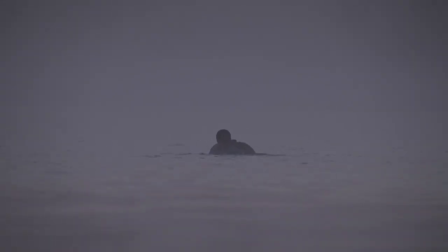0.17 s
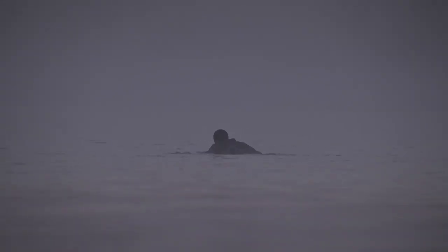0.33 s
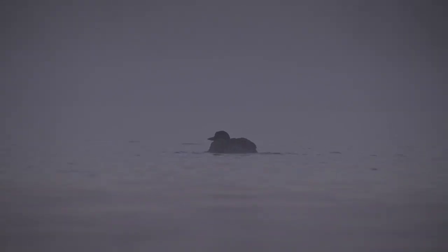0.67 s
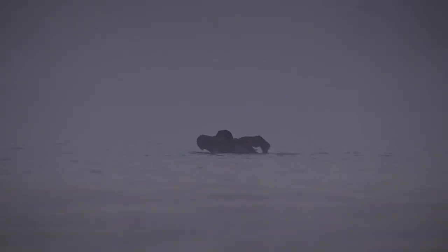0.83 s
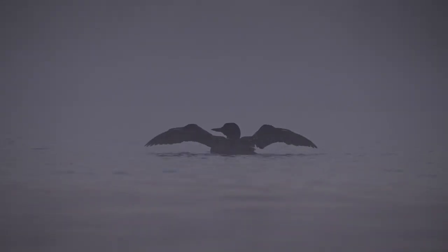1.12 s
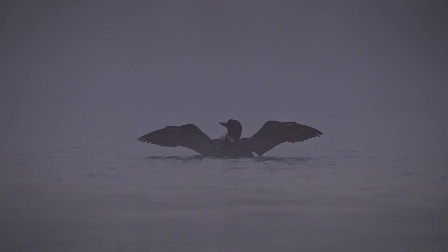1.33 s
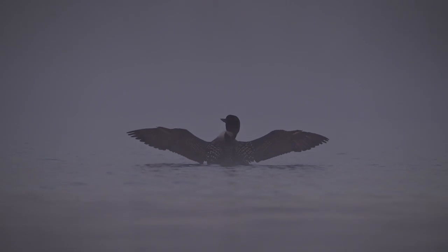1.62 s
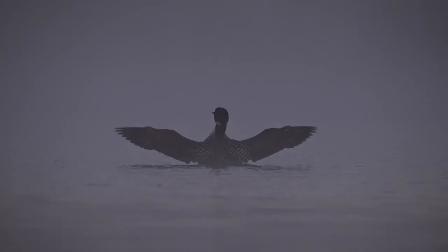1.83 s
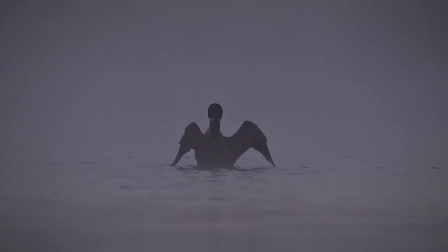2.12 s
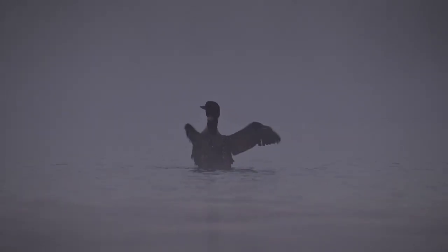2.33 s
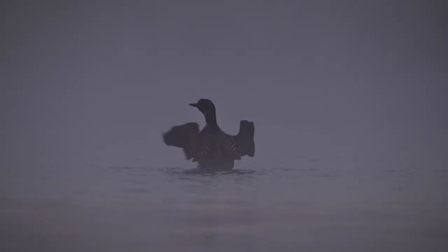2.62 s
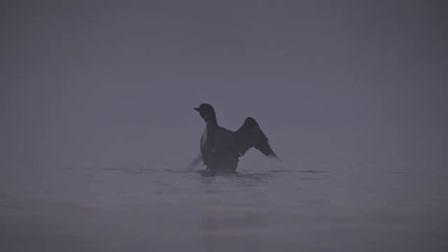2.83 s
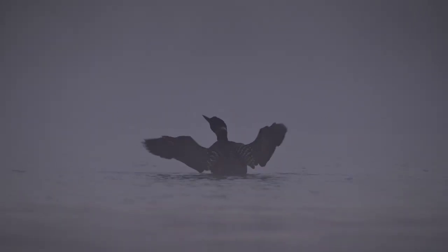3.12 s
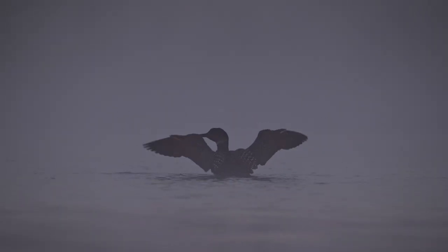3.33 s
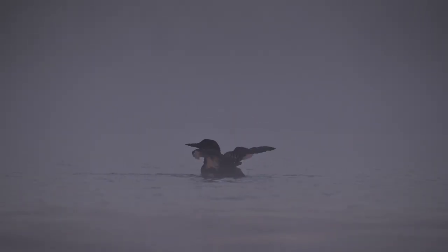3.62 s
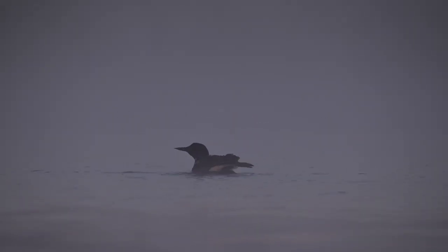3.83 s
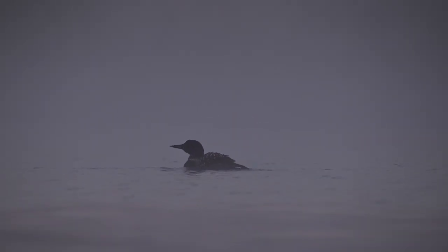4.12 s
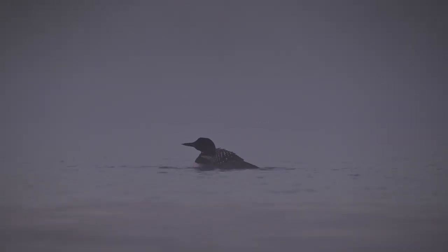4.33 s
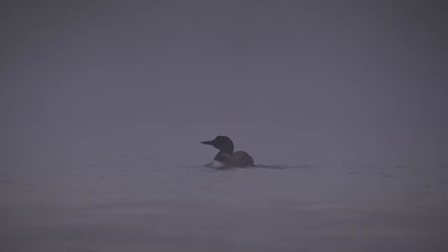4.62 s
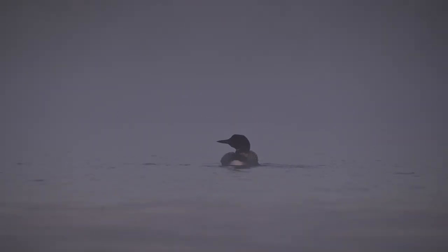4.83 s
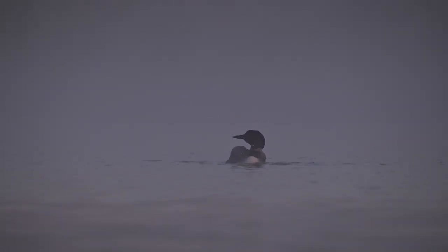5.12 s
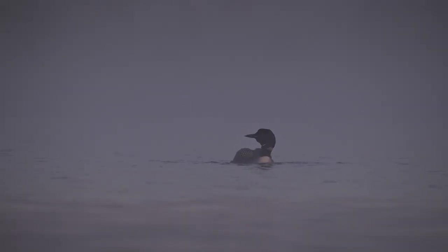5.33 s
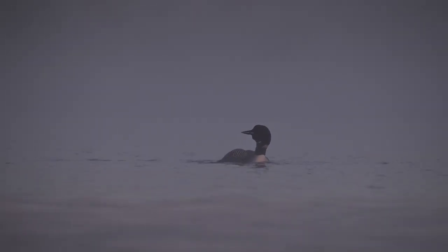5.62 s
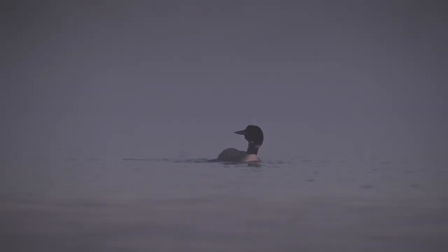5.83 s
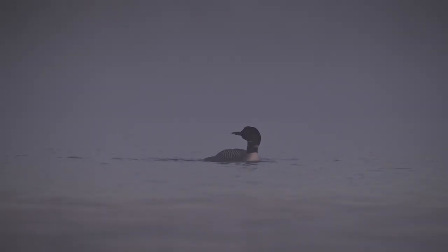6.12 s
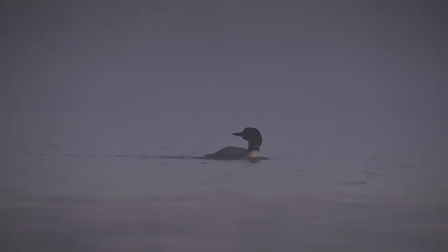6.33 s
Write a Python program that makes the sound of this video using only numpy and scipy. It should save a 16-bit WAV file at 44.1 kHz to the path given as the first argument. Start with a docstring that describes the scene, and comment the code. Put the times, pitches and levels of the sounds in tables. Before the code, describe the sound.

Quiet lake hush, faint birds chirping and tiny water drops, soft wing beats, then a loon's short hoot and a rising, echoing wail.

```python
"""A still, misty lake: a loon beats its wings, moans low, gives a short wavering hoot, then a wail
that breaks up a register and back. Its tones are sums of harmonics; nearby water and, half a second later,
the far shore return them. Songbirds whistle in the woods to the right, drops ring near the microphone,
and shaped noise makes the wing beats, low buffets, a far rasp, the air and the microphone hiss."""
import sys
import numpy as np
from scipy import signal
from scipy.fft import rfft, irfft
from scipy.io import wavfile
from scipy.ndimage import uniform_filter1d

SR = 44100
rng = np.random.default_rng(int(sys.argv[2]) if len(sys.argv) > 2 else 0)


def transcribe(u):
    """Save the signal u as a 16-bit wav file named by the first command-line argument.

    u: samples, shape (n,) or (channels, n), limited to [-1, 1]; the rate is SR.
    q: integer samples, one column per channel.
    """
    v = np.clip(np.atleast_2d(u).T, -1, 1)
    q = np.round(v * 32767).astype(np.int16)
    wavfile.write(sys.argv[1], SR, q)


N = 285327


def amp(db):
    """Decibels to gain."""
    return 10 ** (np.asarray(db) / 20)


def unit(x):
    """Scales to rms 1."""
    return x / np.sqrt(np.mean(x ** 2) + 1e-20)


def read(points, hz):
    """Reads a curve of (Hz, value) points on a log-frequency axis."""
    f, value = np.transpose(points)
    return np.interp(np.log(hz + 1), np.log(f + 1), value)


def colour(x, points):
    """Filters by a spectrum of (Hz, dB) points."""
    size = x.shape[-1]
    gain = amp(read(points, np.fft.rfftfreq(size, 1 / SR)))
    return irfft(rfft(x) * gain, size)


def wander(size, rate_hz):
    """Random drift slower than about rate_hz, cut from a stretch of at least a second with rms 1."""
    length = max(size, SR)
    hz = np.fft.rfftfreq(length, 1 / SR)
    slow = rfft(rng.standard_normal(length)) * np.exp(-(hz / rate_hz) ** 2)
    return unit(irfft(slow, length))[:size]


def add(mix, s, sound):
    """Mixes a sound in at a time in seconds."""
    part = mix[..., max(round(s * SR), 0):][..., :sound.shape[-1]]
    part += sound[..., :part.shape[-1]]


def fade(size, edge_s):
    """Soft start and end; a negative edge leaves both hard."""
    return signal.windows.tukey(size, min(2 * edge_s * SR / size, 1))


def pan(side_db):
    """Left and right gains for a level difference; positive is louder on the left."""
    return amp(np.array([[.5], [-.5]]) * side_db)


def noise_pair(left, other, likeness):
    """Makes a right channel that shares the given likeness with the left."""
    return np.array([left, likeness * left + np.sqrt(1 - likeness ** 2) * other])


def scatter(x, shape, spectrum, likeness):
    """Many random reflections, level following a curve over delay; energy 1 before the colouring."""
    delay, db = np.transpose(shape)
    t = np.arange(2 * SR) / SR
    inside = t < delay[-1]
    left, other = rng.standard_normal((2, len(t))) * amp(np.interp(t, delay, db)) * inside
    taps = colour(noise_pair(left, other, likeness) / np.linalg.norm(left), spectrum)
    return signal.fftconvolve(np.atleast_2d(x), taps[:, inside], axes=1)[:, :N]


def hiss(db=-67):
    """The microphones' own steady hiss: coloured noise, unrelated between the two."""
    # Each row: frequency in Hz, relative level in dB.
    hiss_colour = [(1200, -16), (2400, 7.5), (3500, 2), (5000, 3), (6500, -0.5), (8800, -1.5), (9600, 0.5),
                   (10300, 2.5), (11000, -2), (12000, -5), (14000, -8.5), (15700, -26)]
    return amp(db) * unit(colour(rng.standard_normal((2, N)), hiss_colour))


def air(level_db=-56.25, swell_db=0.89):
    """Steady hush over the lake: noise alike at both microphones in the bass, swelling slightly."""
    # Hush at its source. Each row: frequency in Hz, relative level in dB per Hz.
    air_colour = [(15, -37), (25, -3), (49, -1), (113, -2), (197, -5.5), (414, -4.5), (630, -6.5),
                  (680, -7.5), (840, -2), (960, -7), (1230, -10.5), (1640, -14), (2400, -15), (3120, -39.5),
                  (5280, -120)]
    # The distance takes away the treble. Each row: frequency in Hz, gain in dB.
    distance_colour = [(1500, 1.5), (2300, -3.5), (3300, 3), (6000, -23)]
    # Each row: frequency in Hz, left-right likeness (kept within -1 and 0.992).
    likeness_curve = [(60, 0.99), (300, 0.98), (640, 0.86), (1400, 0.36), (3100, -1.1)]
    hz = np.fft.rfftfreq(N, 1 / SR)
    left, other = rfft(rng.standard_normal((2, N)))
    likeness = np.clip(read(likeness_curve, hz), -1, .992)
    pair = colour(irfft(noise_pair(left, other, likeness), N), air_colour)
    level = amp(level_db + swell_db * wander(N, 5.2))
    return level * unit(colour(pair, distance_colour))


def puffs(rows, spectrum):
    """Swells of coloured noise, each rising and falling along a bell curve."""
    t, out = np.arange(N) / SR, np.zeros(N)
    noise = colour(rng.standard_normal(N), spectrum)
    for s, half_s, db in rows:
        swell = np.exp(-.5 * ((t - s) / half_s) ** 2)
        puff = noise * swell
        out += amp(db) * puff * np.linalg.norm(swell) / np.linalg.norm(puff)
    return out


def buffets():
    """Low buffets of air: smooth swells of bass noise."""
    # Each row: centre in seconds, half length in seconds, level in dB.
    buffet_rows = [(.02, 0.028, -50), (.8, .04, -56.5), (.92, 0.018, -48), (2.7, 0.22, -60),
                   (3.15, 0.1, -60)]
    # Each row: frequency in Hz, relative level in dB.
    buffet_colour = [(10, -16), (35, -3.5), (55, -5.5), (90, -26), (200, -39), (600, -80)]
    return puffs(buffet_rows, buffet_colour)


def far_rasp(db=-59.0):
    """A far hoarse sound, twice: swells of noise in the middle of the range."""
    # Each row: frequency in Hz, relative level in dB.
    rasp_colour = [(500, -57), (830, -13), (1100, -11), (1400, -2.5), (1620, 0), (1800, 5), (2000, -14),
                   (2600, -50)]
    return puffs([(.56, 0.098, db), (.83, 0.1, db - 0.5)], rasp_colour)


def whistle(hz, flutter_db, jitter):
    """A songbird's sine along a pitch curve, fluttering on its way through the trees."""
    knots = rng.standard_normal((2, 100))  # one random value every 150 samples
    waver, flutter = (np.interp(np.arange(len(hz)) / 150, np.arange(100), row) for row in knots)
    phase = 2 * np.pi * np.cumsum(hz * (1 + jitter * waver)) / SR
    return np.sin(phase) * amp(flutter_db * flutter)


def slur(length, start_hz, middle_hz, end_hz, db, flutter_db=11.5, jitter=0.0085):
    """One whistled arc of a distant songbird, its pitch a parabola through three points."""
    u = np.linspace(-1.1, 1.1, int(1.1 * max(length, .01) * SR))  # overruns the end points a little
    slope_hz = (end_hz - start_hz) / 2
    bend_hz = (start_hz + end_hz) / 2 - middle_hz
    tone = whistle(middle_hz + u * slope_hz + u ** 2 * bend_hz, flutter_db, jitter)
    return amp(db) * unit(tone * signal.windows.tukey(len(u), .35))


def deep_whistles():
    """Whistled arcs from deep in the woods, some falling and some turning up."""
    # Each row: start in seconds, length in seconds, start, middle and end pitch in Hz,
    # level in dB before the trees reflect it.
    whistle_rows = [(1.3, 0.19, 3000, 2000, 2100, -70.5), (4.83, .26, 3200, 2200, 1900, -70.5),
                    (2.4, 0.15, 2500, 4400, 6400, -74), (3.9, 0.065, 4100, 2800, 3900, -82)]
    out = np.zeros(N)
    for s, *row in whistle_rows:
        add(out, s, slur(*row))
    return out


def far_chorus(far_db=-69.5, count=480):
    """Many faint songbirds: random short arcs, spread from just left of centre to the right."""
    # How busy the distant birds are. Each row: time in seconds, level in dB (only its shape counts).
    busy = [(0.0, -63), (0.33, -67), (0.98, -63.5), (2.3, -64.5), (3.44, -63), (3.68, -69.5), (4.14, -60.5),
            (4.72, -67.5), (5.4, -63), (5.9, -64.5)]
    busy_s, busy_db = np.transpose(busy)
    out = np.zeros((2, N))
    for when, length, pitch, sweep, arch, level, side in rng.random((count, 7)):
        s = when * N / SR
        hz = 3350 + 680 * np.arcsin(2 * pitch - 1)
        glide_hz = 550 * np.cos(np.pi * sweep)
        bow_hz = 450 * (arch - .25)
        db = far_db + 8 * (level - .5)
        db -= 5 * ((hz - 3150) / 1000) ** 2  # the middle of the range carries best
        db += np.interp(s, busy_s, busy_db) - busy_db.mean()
        start_hz, end_hz = hz - glide_hz - bow_hz, hz + glide_hz - bow_hz
        song = slur(.03 + 0.044 * length, start_hz, hz, end_hz, db, flutter_db=2.5, jitter=.02)
        late_left = np.roll(song, int(10 * side) - 2)  # samples: the right microphone mostly hears first
        add(out, s, np.array([late_left, song]) * pan(2 - 9 * side))
    return out


def swoop(rise_s, hold_s, fall_s, top_hz, db, edge_s=0.014):
    """One chirp of a near songbird: up from the foot to its top pitch, a hold, and down again."""
    foot_hz, foot_db, roundness = 2866, 0.5, 1.2  # foot level is relative to the top; roundness is a power
    up, hold, down = (int(max(s, 0) * SR) for s in (rise_s, hold_s, fall_s))
    below = np.concatenate([np.linspace(1, 0, up), np.zeros(hold), np.linspace(0, 1, down)]) ** roundness
    tone = whistle(top_hz + (foot_hz - top_hz) * below, flutter_db=4.5, jitter=0.0098)
    return amp(db) * unit(tone * amp(foot_db * below) * fade(len(tone), edge_s))


def near_birds(count=14):
    """The loud chirps, with softer rising or falling ones strewn between them."""
    # Each row: start in seconds, rise, hold and fall in seconds, top pitch in Hz,
    # level in dB before the songbird mix.
    chirp_rows = [(0.353, 0.021, .05, .022, 4150, -55.5), (.468, 0, 0.0049, .043, 3750, -57),
                  (.562, 0.076, 0, 0.018, 4420, -52.5), (1.176, 0.0027, 0.00078, 0.036, 3970, -54.5),
                  (1.253, 0.024, 0.048, 0.0071, 3960, -53), (1.532, 0.04, 0.0042, 0.029, 4300, -53),
                  (1.699, 0.051, 0.0011, 0.038, 4450, -54.5), (2.189, 0.035, 0, 0.081, 3816, -54.5),
                  (2.535, 0.0035, 0, 0.063, 3700, -57), (2.748, 0.0036, 0.028, .035, 3490, -54),
                  (3.239, 0.077, 0.0073, 0.066, 4430, -57), (3.389, 0.0064, 0.0008, 0.044, 3850, -55.5),
                  (3.395, .065, 0, 0.034, 4235, -54), (3.519, 0, 0.002, 0.053, 3950, -54.5),
                  (3.568, 0, .03, 0.044, 3610, -58), (3.948, 0.0013, 0, .05, 3940, -56.5),
                  (4.052, 0, 0, 0.034, 3750, -59.5), (4.125, 0.043, 0.01, 0.0041, 3750, -54.5),
                  (4.449, .08, .03, .04, 3586, -56.5), (5.019, .06, 0.016, 0.0029, 4470, -62),
                  (5.134, .055, 0, 0.0019, 4780, -62), (5.183, 0.036, .012, 0.042, 3620, -56),
                  (5.31, 0.064, 0, 0.0093, 4120, -57), (5.603, 0.0075, 0.00079, 0.037, 3900, -51),
                  (6.092, 0.00049, 0, .05, 4050, -58.5), (6.14, 0.08, 0.00096, 0.0044, 4250, -59.5),
                  (6.293, 0, 0, 0.047, 3750, -54.5), (6.358, 0, 0, .052, 4180, -57)]
    soft_db, soft_top_hz, soft_s = -63.5, 3750, 0.024  # middle level and pitch, and the length
    out = np.zeros(N)
    for s, *row in chirp_rows:
        add(out, s, swoop(*row))
    for k, (when, rising, pitch, level) in enumerate(rng.random((count, 4))):
        rise_s, fall_s = (soft_s, 0) if rising < .5 else (0, soft_s)
        top_hz = soft_top_hz + 900 * (pitch - .5)
        db = soft_db + 5 * (level - .5)
        add(out, (k + when) / count * N / SR, swoop(rise_s, 0, fall_s, top_hz, db))
    return out


def songbirds(near_db=2.1, left_db=-8, woods_db=-12.0):
    """The nearest birds sit to the right, reaching the left later and weaker; the woods blur them all."""
    # Reflections among the trees. Each row: delay in seconds, relative level in dB.
    woods = [(0, 0), (.03, -2), (.45, -45)]
    near, far = near_birds(), far_chorus()
    near_pair = np.array([amp(left_db) * np.roll(near, shift=5), near])
    direct = amp(near_db) * near_pair + far
    into_woods = amp(woods_db) * (near + far[1]) + deep_whistles()
    return direct + scatter(into_woods, woods, [(2000, 6.5), (5000, -1.2)], 0) * pan(-1.4)


def drops(side_db=3.0, tail_db=-27, tail_s=0.012, top_hz=12500, rise_s=0.00021, count=4):
    """Each drop is a short noise spatter that rings high resonances and leaves a faint tail."""
    # Each row: start in seconds, level in dB.
    drop_rows = [(0.1073, -33.5), (0.1147, -36), (0.69, -32.5), (1.968, -49.5), (2.569, -53), (2.9916, -32),
                 (3.024, -34.5), (3.094, -54), (3.574, -55), (3.652, -50), (4.696, -49.5), (5.0334, -50.5),
                 (5.052, -48.5), (5.134, -48.5)]
    # What the drops ring. Each row: resonance in Hz, width in Hz, relative level in dB.
    modes = [(4120, 550, -12), (4600, 64, -3.5), (7290, 320, -4), (7880, 190, 4), (8900, 360, -4.5),
             (10300, 380, -8), (10570, 510, -1.5), (11900, 900, -12)]
    decay_s, rebound_s, rebound_db = 0.0016, 0.0064, -13  # a spatter, then a droplet falls back
    big_db, brighter = -36, 1  # smaller drops are brighter: dB per octave for each dB below a big drop
    speck_db = -54  # faint drops at random moments
    out, t = np.zeros((2, N)), np.arange(4096) / SR
    hz = abs(np.fft.fftfreq(len(t), 1 / SR))
    ring = np.sqrt(sum(amp(db) ** 2 / (1 + (2 * (hz - f) / width) ** 2) for f, width, db in modes))
    ring = ring / np.sqrt(1 + (hz / top_hz) ** 14)  # treble limit
    ring = ring / np.sqrt(1 + (3000 / (hz + 100)) ** 2)  # bass limit
    burst = (1 - np.exp(-t / rise_s)) * (np.exp(-t / decay_s) + amp(tail_db) * np.exp(-t / tail_s))
    burst = burst + amp(rebound_db) * np.interp(t - rebound_s, t, burst)
    specks = [(when * N / SR, speck_db) for when in rng.random(count)]
    for s, db in drop_rows + specks:
        bright_db = brighter * (big_db - db)
        octaves = np.log2(np.clip(hz, 3000, 11000) / 8000)
        gain = unit(ring * amp(bright_db * octaves))
        body = np.exp(signal.hilbert(np.log(gain + 1e-5)).conj())  # causal: it rings only after the blow
        spatter = rng.standard_normal((2, len(t))) * burst
        left, right = np.fft.ifft(np.fft.fft(spatter) * body).real
        add(out, s, amp(db) * pan(side_db) * np.array([left, np.roll(right, shift=2)]))
    return out


def wing_beats():
    """The loon's wing beats: very short swells of noise, strongest in the low middle."""
    # Each row: centre in seconds, half length in seconds, level in dB.
    beat_rows = [(2.49, 0.0066, -56), (2.502, 0.0087, -52.5), (2.682, 0.0051, -48), (2.84, .003, -53),
                 (2.86, 0.0056, -41.5)]
    # Each row: frequency in Hz, relative level in dB.
    wing_colour = [(100, -12), (230, -4.5), (350, 5.5), (480, -2.5), (700, -16), (1100, -15.5), (1600, -15),
                   (2200, -32), (5000, -45), (12000, -65)]
    return puffs(beat_rows, wing_colour)


def shore_echo(voice, db=-24):
    """The far shore returns the calls as a spread of reflections, strongest half a second late."""
    # Each row: delay in seconds, relative level in dB.
    shore = [(0, -33), (.1, -22.5), (.3, -25), (.46, -16), (.54, 3.5), (.62, -6), (.75, -6), (1.1, -16),
             (1.501, -36)]
    # Each row: frequency in Hz, gain in dB.
    shore_colour = [(300, -6.5), (800, 1), (1050, 4.5), (1650, 7), (2200, 10.5), (3500, -5.5), (8000, -24)]
    return amp(db) * scatter(voice.mean(0), shore, shore_colour, .7)


def water_echo(voice, db=-31):
    """The water returns the calls within 60 ms, alike at both microphones."""
    shape = [(0, -16.5), (.006, -2.5), (.014, -3.5), (.06, -29)]  # delay in seconds, relative level in dB
    return amp(db) * scatter(voice.mean(0), shape, [(500, 0), (4000, 0)], 1.0)


def note(t, gesture, register, upper_flutter_db=2.5):
    """A nearly pure tone in one register; the low register is hoarse and has a weak fundamental."""
    # Each register: pitch ratio, fundamental in dB, upper harmonics in dB, their gain in dB per dB of
    # effort, pitch jitter as a share, shimmer in dB, soft edge in seconds (negative: none).
    registers = {"low": (0.77, -12.5, -1, 0.2, .014, 1.2, -0.02),
                 "middle": (1.0, 0.054, -1.8, 1.0, .0015, .08, .0065),
                 "high": (1.1864, -0.18, -0.5, 0.72, .0015, -0.045, 0.0046)}
    # Strength of the second harmonic. Each row: its frequency in Hz, level in dB.
    octave_curve = [(750, -4.5), (1020, -3.5), (1130, -12), (1260, -21.5), (1450, -18.5), (1700, -18),
                    (1780, -23), (2060, -36.5)]
    # Upper harmonics against the whole note. Each row: frequency in Hz, level in dB.
    throat = [(1100, -16), (1350, -15.5), (1700, -19.5), (2050, -38), (2350, -46.5), (2650, -41.5),
              (3100, -34), (3450, -33), (4100, -62.5), (5200, -69), (8300, -57), (9300, -71.5),
              (10400, -58.5), (12500, -87)]
    # Where the loon sits. Each row: frequency in Hz, left-right difference in dB.
    loon_side = [(400, -1), (800, 1.25), (1030, 4.5), (1600, 5), (2080, -1), (3200, 2), (8000, -3.5)]
    falter_db, falter_s = -5.5, 0.0092  # the voice falters as a note nears its end
    ratio, first_db, upper_db, effort_gain, jitter, shimmer_db, edge_s = registers[register]

    s, *columns = np.transpose(gesture)
    curves = [np.interp(t, s, column) for column in columns]
    hz, effort_db, octave_db = (uniform_filter1d(c, size=500, mode="nearest") for c in curves)
    hz = ratio * hz * (1 + jitter * wander(len(t), 200))
    effort_db = effort_db + falter_db * np.exp((t - t[-1]) / falter_s)
    phase = 2 * np.pi * np.cumsum(hz) / SR

    upper = amp(effort_db + upper_db + effort_gain * (effort_db + 21.5))  # the harder the push, the brighter
    levels = [amp(effort_db + first_db), amp(effort_db + octave_db + read(octave_curve, 2 * hz))]
    for k in range(3, 5 if register == "low" else 13):
        flutter_db = upper_flutter_db * wander(len(t), 25)
        levels.append(upper * amp(read(throat, k * hz) + flutter_db))
    tone = np.zeros((2, len(t)))
    for k, level in enumerate(levels, 1):
        tone += level * np.sin(k * phase) * pan(read(loon_side, k * hz))
    shimmer = amp(shimmer_db * wander(len(t), 100))
    return np.sqrt(2) * tone * shimmer * fade(len(t), edge_s)


def loon():
    """Three calls; each break of register starts a new note on the same gesture of pitch and effort."""
    # Each row of a call: time in seconds, pitch in the middle register in Hz, effort in dB,
    # extra strength of the octave in dB.
    moan = [(3.27, 602, -53.5, -1.5), (3.31, 633, -44, -11.5), (3.37, 531, -50, -15),
            (3.45, 480, -52, -1.5)]
    hoot = [(3.658, 490, -45, -3), (3.685, 540, -43.5, -5), (3.755, 546, -42.5, -7.5),
            (3.772, 645, -35.5, -6.5), (3.793, 846, -35, 13.5), (3.82, 746, -33.3, 3.5),
            (3.866, 716, -39.5, 3), (3.895, 887, -30.5, 11.5), (3.932, 761, -31.5, -0.5),
            (3.975, 736, -35.3, -1.5), (4.012, 784, -33, 7), (4.049, 688, -44.5, -4)]
    wail = [(5.448, 473.2, -44, -1.5), (5.5, 622.4, -34, 3), (5.546, 772, -27.2, -3.5),
            (5.74, 814.9, -24, -2.5), (5.81, 852, -21.5, -6.5), (5.84, 868.6, -23.5, -4),
            (5.95, 877, -22.2, 0), (6.04, 833, -26, -21), (6.075, 757, -29.5, 1), (6.135, 708.4, -35, -2.5),
            (6.176, 674, -45, -2), (6.216, 546, -43, -2)]
    # A call starts low, and the voice breaks as the pitch moves. Each row: time in seconds, new register.
    hoot_breaks = [(3.787, "middle")]
    wail_breaks = [(5.546, "middle"), (5.83, "high"), (6.059, "middle"), (6.176, "low")]
    overlap_s = .0028  # both registers sound for a moment on either side of a break
    out = np.zeros((2, N))
    for gesture, breaks in (moan, []), (hoot, hoot_breaks), (wail, wail_breaks):
        starts = [(gesture[0][0], "low")] + breaks
        ends = [s for s, _ in breaks] + [gesture[-1][0]]
        for (start, register), end in zip(starts, ends):
            t = np.arange(start - overlap_s, end + overlap_s, 1 / SR)
            add(out, t[0], note(t, gesture, register))
    return out


def scene():
    """The loon and its echoes from the water and the shore, with the small sounds of the lake."""
    voice = loon()
    background = hiss() + air() + buffets() + far_rasp()
    echoes = shore_echo(voice) + water_echo(voice)
    return background + songbirds() + drops() + wing_beats() + echoes + voice


def record(dry):
    """The recorder's band limit: a steep low-pass filter."""
    edge_hz = 15720
    low_pass = signal.firwin(511, edge_hz, window=("kaiser", 9), fs=SR)
    return signal.oaconvolve(dry, low_pass[None], "same")


dry = scene()
out = record(dry)
transcribe(out)
```